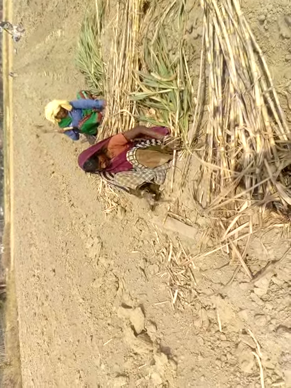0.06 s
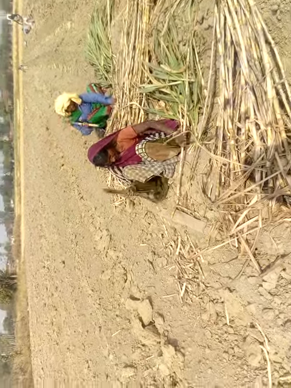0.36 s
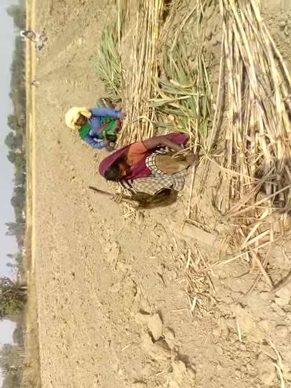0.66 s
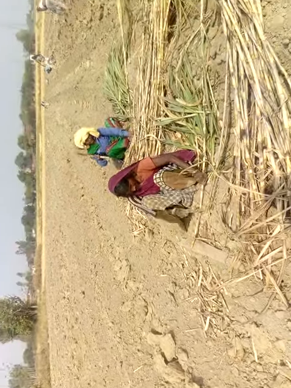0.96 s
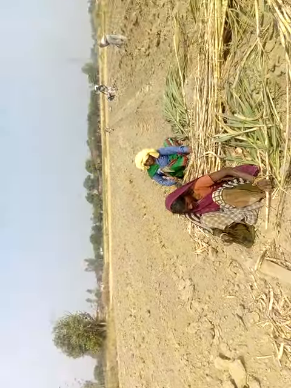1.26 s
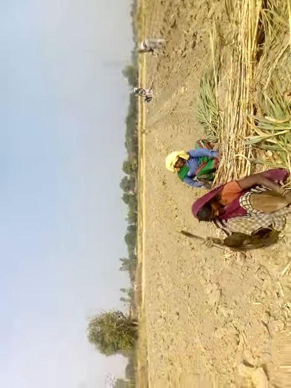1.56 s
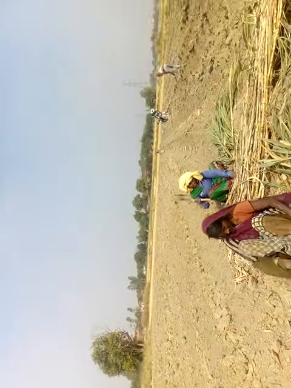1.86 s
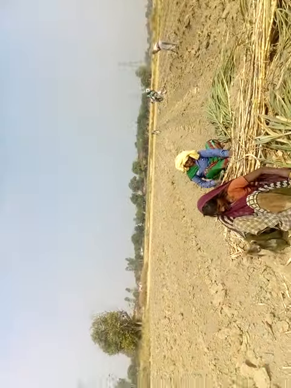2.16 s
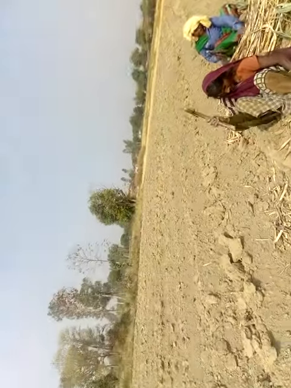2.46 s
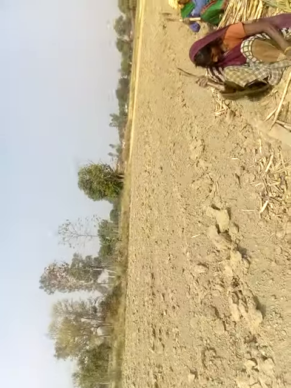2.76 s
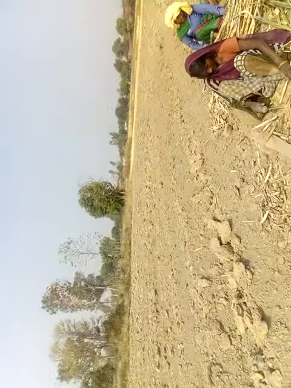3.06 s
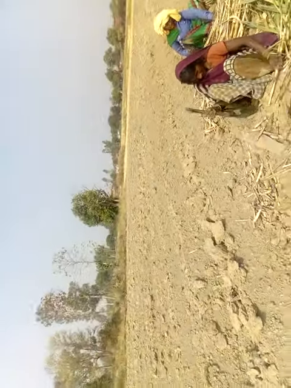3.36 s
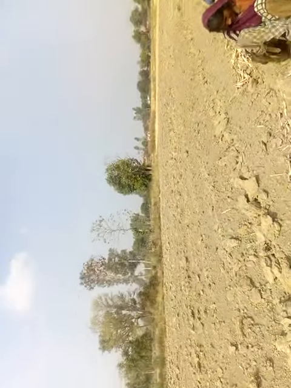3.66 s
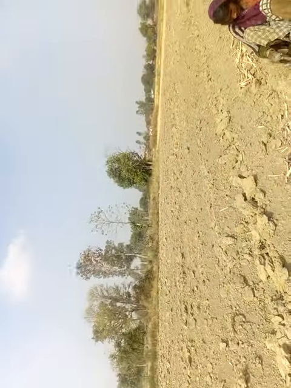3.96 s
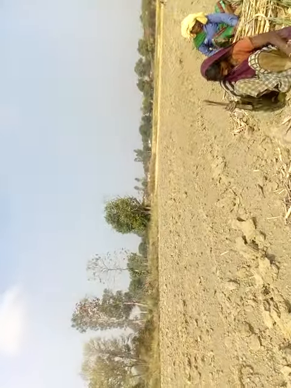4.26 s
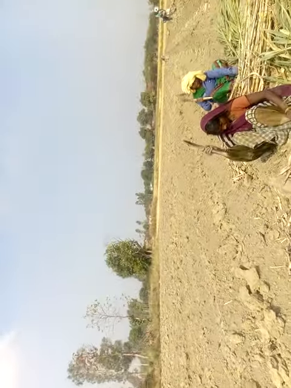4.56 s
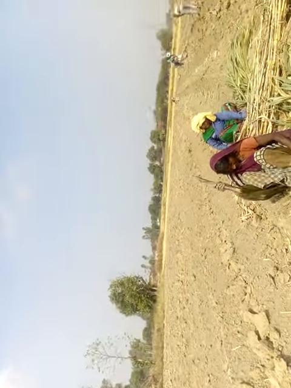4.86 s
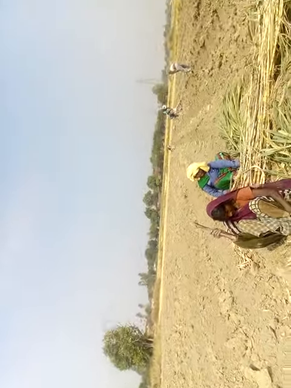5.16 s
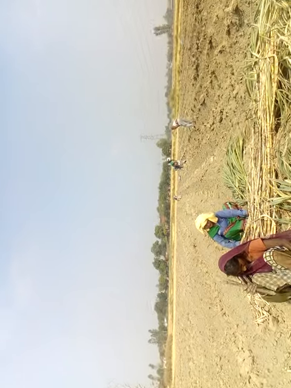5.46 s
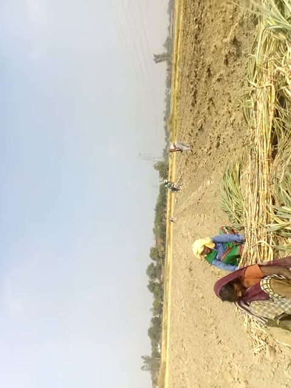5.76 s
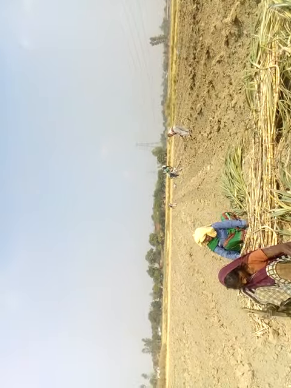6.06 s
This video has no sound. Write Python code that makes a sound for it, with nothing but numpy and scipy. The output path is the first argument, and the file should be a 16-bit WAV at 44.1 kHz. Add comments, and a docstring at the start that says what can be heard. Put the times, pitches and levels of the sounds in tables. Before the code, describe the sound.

Crisp, crunching chops through cane stalks knock on wood, mixed with dry rustling and quick blade scrapes, close by outdoors.

```python
"""Chopping sugarcane in an open field

A sickle crunches through the stalk, knocks a wooden block and thumps the soil; at times the steel rings.
Between strokes the cane is dragged through dry leaves and scraped clean; cut lengths settle on the soil.
Birds whistle far off over a low drone and a soft hush, with a few thin, high tings."""
import sys
import numpy as np
from scipy import signal
from scipy.fft import rfft, irfft, next_fast_len
from scipy.io import wavfile
from scipy.ndimage import uniform_filter1d, map_coordinates

SR = 44100
rng = np.random.default_rng(int(sys.argv[2]) if len(sys.argv) > 2 else 0)


def dump_mix(stems):
    """Bounce the given channels to the path in sys.argv[1] as a 16-bit WAV at rate SR."""
    frames = np.atleast_2d(stems).T  # one column per channel
    limited = np.clip(frames, -1, 1)  # hard clip at full scale
    pcm = np.round(limited * 32767).astype(np.int16)
    wavfile.write(sys.argv[1], SR, pcm)


N = 277830

# Dry-leaf spectrum. Each row: frequency in Hz, density in dB.
LEAF_SPECTRUM = [(800, -31), (1500, -9), (2400, -2.5), (3030, -4), (4350, 4), (5200, 2.5), (6300, 4),
                 (6900, -4), (8100, -22), (11000, -36), (15500, -40)]
LEAVES_REF_DB = -49.5  # heap and crackle levels follow the leaves about this point


def amp(db):
    """Decibels to gain."""
    return 10 ** (np.asarray(db) / 20)


def unit(x):
    """Scale to rms 1."""
    return x / np.sqrt(np.mean(x ** 2) + 1e-20)


def along(points, hz):
    """Interpolate (Hz, value) points on a log axis."""
    knots_hz, values = np.transpose(points)
    return np.interp(np.log(hz + 1), np.log(knots_hz + 1), values)


def wobble(rate_hz):
    """Smooth random curve, rate_hz knots a second."""
    knots = rng.standard_normal(int(N * rate_hz / SR) + 4)
    return map_coordinates(knots, [np.arange(N) * rate_hz / SR])


def filtered(x, response):
    """Apply a gain given as a function of Hz."""
    size = next_fast_len(len(x) + 4096)
    return irfft(rfft(x, size) * response(np.fft.rfftfreq(size, 1 / SR)), size)[:len(x)]


def grit(spectrum, spiky_db, size=N):
    """Dense, uneven clicks, coloured, at rms 1."""
    noise = rng.standard_normal(size)
    spread = np.repeat(rng.standard_normal(size // 16 + 1), 16)[:size]
    clicks = noise * amp(spiky_db * np.clip(spread, -2.5, 2.5))
    return unit(filtered(clicks, lambda hz: amp(along(spectrum, hz))))


def band(centre_hz, octaves, size=N):
    """Noise in one resonance, at rms 1."""
    noise = rng.standard_normal(size)
    return unit(filtered(noise, lambda hz: 1 / (1 + (np.log2((hz + 1) / centre_hz) / octaves) ** 2) ** 2.66))


def patchy(x, depth_db):
    """Vary the colour in patches of time and frequency; rms 1."""
    spectra = signal.stft(x, nperseg=1024)[2]
    patches = rng.standard_normal(spectra.shape)
    for _ in range(2):
        patches = uniform_filter1d(uniform_filter1d(patches, size=7, axis=0), size=9, axis=1)
    return unit(signal.istft(spectra * amp(depth_db * unit(patches)), nperseg=1024)[1][:N])


def ring(modes, t):
    """Damped modes, softly struck, at slightly random strengths."""
    tones = sum(amp(db + rng.standard_normal() - 60 * t / t60_s) * np.sin(2 * np.pi * hz * t)
                for hz, db, t60_s in modes)
    return tones * (1 - np.exp(-t / 0.0006))


def add(track, start_s, sound):
    """Mix a sound into the track."""
    start = round(start_s * SR)
    track[start:start + len(sound)] += sound[:N - start]


def air():
    """Soft, shifting hush of open country."""
    # Each row: frequency in Hz, density in dB.
    hush_spectrum = [(120, 8.5), (250, 4), (700, 2), (1100, -7), (1500, 3.5), (2300, -0.5), (3300, -5),
                     (5500, -2), (6600, -52), (8000, -23.5), (15500, -28.5)]
    return amp(-62) * patchy(grit(hush_spectrum, spiky_db=2), depth_db=4.5)


def drone():
    """Low, wavering drone over the field."""
    # Each row: time in seconds, relative level in dB.
    contour = [(0, -47.5), (0.4, -55.5), (0.9, -58.5), (1.3, -54.5), (1.7, -56.5), (2.1, -51.5), (2.9, -57),
               (3.45, -53), (4.1, -52.1), (4.6, -56), (5.4, -49), (5.9, -50), (6.3, -55.5)]
    # Each row: frequency in Hz, density in dB.
    rumble_spectrum = [(15, -29.5), (28, -21), (42, -0.5), (58, -8), (73, 5.5), (90, -5), (115, -11),
                       (160, -19), (260, -26.5), (500, -86)]
    contour_db = np.interp(np.arange(N) / SR, *np.transpose(contour))
    waver_db = 1.9 * wobble(3.7)
    return amp(contour_db + waver_db - 1.5) * grit(rumble_spectrum, spiky_db=-1)


def birds():
    """Distant whistles swell and fade along bowed, wavering glides."""
    # Each row: start and length in seconds, start and end pitch in Hz, upward bow in Hz, level in dB.
    whistles = [(0.65, 0.33, 5200, 6600, 201.5, -65), (4.821, .18, 1274, 1330, 159, -49),
                (5.599, .5, 4840, 6950, -93.5, -60)]
    out, t = np.zeros(N), np.arange(N) / SR
    for start_s, length_s, start_hz, end_hz, bow_hz, db in whistles:
        progress = np.clip((t - start_s) / length_s, 0, 1)
        arch = np.sin(np.pi * progress)
        glide_hz = start_hz + (end_hz - start_hz) * progress + bow_hz * arch
        waver_db = 1.5 * wobble(40)
        pitch_hz = glide_hz * (1 + 0.0065 * wobble(200))
        out += arch * amp(db + waver_db) * np.sin(2 * np.pi * np.cumsum(pitch_hz) / SR)
    return out


def tings():
    """Thin rings high in the treble: a few clear, weaker ones at random."""
    # Each row: start in seconds, level in dB.
    clear = [(1.118, -61), (1.571, -69), (1.822, -54), (2.009, -60), (2.826, -63), (4.881, -64)]
    faint = [(start_s, -76.5) for start_s in rng.random(10) * N / SR]
    out, t = np.zeros(N), np.arange(SR // 3) / SR
    for start_s, db in clear + faint:
        envelope = amp(db - 60 * t / 0.22) * (1 - np.exp(-t / 0.00086))
        add(out, start_s, envelope * band(9980, octaves=0.036, size=len(t)))
    return out


def ground_scatter(x):
    """Short scatter from clods and piles of cane."""
    # Each row: frequency in Hz, T60 in seconds.
    decay = [(100, 0.31), (500, 0.11), (2000, 0.33), (6000, 0.061), (12000, 0.32)]
    hz, t, spectra = signal.stft(rng.standard_normal(SR // 2), SR, nperseg=256)
    tail = signal.istft(spectra * amp(-60 * t / along(decay, hz)[:, None]), SR, nperseg=256)[1]
    delayed = np.pad(x, (round(0.0073 * SR), 0))
    return signal.fftconvolve(delayed, tail / np.linalg.norm(tail))[:N]


def sliding_db():
    """Leaf level: each pull of the cane swells and fades over a faint steady stir."""
    # Each row: peak time, rise and fall in seconds, level in dB.
    pulls = [(0.005, 0.017, 0.056, -54), (0.5, 0.14, 0.77, -66), (1.35, 0.15, 0.15, -60.5),
             (1.52, 0.056, 0.054, -47), (1.79, 0.17, 0.079, -41.5), (1.929, 0.063, 0.048, -43.5),
             (2.07, 0.062, 0.08, -45.5), (2.26, 0.059, 0.073, -33.5), (2.345, .03, 0.022, -40),
             (2.68, 0.29, 0.14, -59), (2.89, 0.032, .085, -58), (3.445, 0.017, 0.067, -41.5),
             (3.7, 0.16, 0.081, -42.5), (3.875, 0.019, 0.16, -44), (4.24, 0.06, 0.15, -52.5),
             (4.43, .03, 0.059, -49.5), (4.58, 0.3, 0.32, -60.5), (5.03, 0.047, 0.18, -56.5),
             (6.28, 0.2, .1, -63.5)]
    stir_db = -70
    t = np.arange(N) / SR
    swells = [amp(db) * np.exp(-((t - peak_s) / np.where(t < peak_s, rise_s, fall_s)) ** 2)
              for peak_s, rise_s, fall_s, db in pulls]
    return 10 * np.log10(amp(stir_db) ** 2 + np.sum(np.square(swells), axis=0))


def crackle(leaves_db):
    """Single leaves tick at random, louder while the cane moves."""
    when, strength = rng.random((170, 2)).T
    ticks = np.bincount((when * N).astype(int), weights=amp(14 * strength ** 2), minlength=N)
    t = np.arange(SR // 200) / SR
    fracture = grit(LEAF_SPECTRUM, spiky_db=1, size=len(t)) * np.exp(-t / 0.0034)
    level_db = -64.5 + 0.47 * (leaves_db - LEAVES_REF_DB)
    return amp(level_db) * unit(signal.fftconvolve(ticks, fracture)[:N])


def rustle(leaves_db):
    """Dry leaves hiss under the sliding cane; the heap beneath is duller and swells less."""
    # Each row: frequency in Hz, density in dB.
    heap_spectrum = [(100, -12), (170, -10.5), (275, -6.5), (536, -1.5), (632, 0), (1080, 2.5),
                     (1490, -4.5), (1630, -0.5), (2800, -6.5), (3640, -50), (6160, -120)]
    heap_db = -55.5 + 0.73 * (leaves_db - LEAVES_REF_DB)
    catching_db = 0.9 * wobble(45)
    leaves = amp(leaves_db + catching_db) * patchy(grit(LEAF_SPECTRUM, spiky_db=3.5), depth_db=1.6)
    heap = amp(heap_db + catching_db) * patchy(grit(heap_spectrum, spiky_db=3), depth_db=0.2)
    return leaves + heap


def thuds():
    """Loose soil answers a settling length with a few soft, low cycles."""
    # Each row: start in seconds, level in dB, pitch in Hz.
    settlings = [(3.26, -37.5, 106), (3.312, -40, 100.6), (5.06, -44, 84.5), (5.625, -44, 75)]
    rise_s = 0.015
    out, t = np.zeros(N), np.arange(SR // 4) / SR
    swell = (t / rise_s * np.exp(1 - t / rise_s)) ** 2
    for start_s, db, hz in settlings:
        add(out, start_s, amp(db) * swell * np.sin(2 * np.pi * hz * t))
    return out


def landing():
    """A cut length drops on the pile with a dry, hollow tap."""
    # Start in seconds, gain in dB.
    drop = (6.1727, -33.5)
    # Each row: frequency in Hz, relative level in dB, T60 in seconds.
    cane_modes = [(484, -2, 0.051), (660, 14, 0.01), (880, 3.5, 0.034), (1170, -13, 0.052),
                  (1410, -2, 0.026), (2030, -27, 0.028), (750, -16, 0.31)]
    start_s, db = drop
    out, t = np.zeros(N), np.arange(SR // 4) / SR
    clatter = 0.6 * amp(-60 * t / 0.062) * band(1350, octaves=1, size=len(t))
    add(out, start_s, amp(db) * (ring(cane_modes, t) + clatter))
    return out


def snaps():
    """Brittle sheaths crack and bits drop in short bursts."""
    # Each row: start in seconds, level in dB, centre in Hz, width in octaves, length in seconds.
    cracks = [(0.9579, -34.5, 3040, 1, 0.007), (1.0054, -37.5, 985, 0.26, 0.007),
              (1.0983, -41.5, 3230, 0.95, 0.0073), (1.257, -49, 1700, 0.75, 0.022),
              (1.3553, -42, 1590, .9, 0.0061), (3.048, -56.5, 2780, 0.44, 0.0054),
              (3.355, -39, 1340, 1.67, 0.0063), (3.718, -39.5, 527, 1.64, 0.015),
              (4.239, -41.5, 4960, 0.8, 0.008), (4.33, -47.5, 1700, 1.4, 0.0082),
              (4.448, -43, 4440, 1, 0.0064), (4.507, -45, 5330, 0.52, 0.011),
              (5.453, -54.5, 1870, 1.5, 0.026)]
    out, t = np.zeros(N), np.arange(SR // 4) / SR
    attack = 1 - np.exp(-t / 0.0003)
    tail = 0.23 * amp(-60 * t / 0.096)
    for start_s, db, centre_hz, octaves, length_s in cracks:
        burst = attack * (np.exp(-(t / length_s) ** 4) + tail)
        add(out, start_s, amp(db) * burst * band(centre_hz, octaves, size=len(t)))
    return out


def scrapes():
    """Quick blade passes strip the leaves; the rind squeals under the edge."""
    # Each row: peak time, rise and fall in seconds, level in dB, squeal in Hz, squeal in dB re friction.
    passes = [(3.356, 0.017, 0.0099, -42, 5350, -26), (3.509, 0.03, 0.02, -27.5, 5700, -5),
              (3.616, 0.042, 0.025, -25.5, 4900, -6.5), (3.687, 0.021, 0.027, -29, 5830, 6.5),
              (4.278, 0.01, 0.0091, -42.5, 4370, 4.5), (4.293, 0.019, 0.0044, -54, 6240, 20.5)]
    # Each row: frequency in Hz, density in dB.
    friction_spectrum = [(120, -87), (200, -52), (321, -21), (430, -24), (564, -10.5), (607, -19),
                         (665, -13.5), (1560, -11), (1950, -7.5), (3240, -3.5), (5110, -1.5), (6240, 0.5),
                         (8050, -27), (15500, -44)]
    out, t = np.zeros(N), np.arange(SR // 2) / SR
    middle_s = t.mean()
    for peak_s, rise_s, fall_s, db, squeal_hz, squeal_db in passes:
        pressure = np.exp(-np.abs((t - middle_s) / np.where(t < middle_s, rise_s, fall_s)) ** 2.32)
        friction = grit(friction_spectrum, spiky_db=2, size=len(t))
        squeal = amp(squeal_db) * band(squeal_hz, octaves=0.36, size=len(t))
        add(out, peak_s - middle_s, amp(db) * pressure * (friction + squeal))
    return out


def steel(place, t):
    """The sickle rings; the strike point sets which modes speak."""
    # Each row: frequency in Hz, relative level in dB, T60 in seconds, most responsive place from 0 to 1.
    blade_modes = [(2868, -4, 0.58, 0.24), (4530, 0.5, 0.34, .05), (5250, -3.5, 0.33, 0.55),
                   (6150, -1, 0.13, 1), (6760, -26, 0.16, 0.85)]
    return ring([(hz, db - 24 * abs(place - best), t60_s) for hz, db, t60_s, best in blade_modes], t)


def thump(hz, t):
    """The block sinks and bounces on the soil."""
    cycles = hz * t
    return -np.sin(2 * np.pi * cycles) * (1 - np.exp(-(cycles / 1.1) ** 2)) * amp(-6.6 * cycles ** 1.3)


def knock(hz, t):
    """About a cycle and a half of pressure leaves the wooden block ringing."""
    # Each row: frequency in Hz, relative level in dB, T60 in seconds.
    block_modes = [(298, -19, 0.042), (649, -5, 0.021), (850, -10.5, 0.022), (1435, -23, 0.036)]
    cycles = hz * t
    push = np.sin(2 * np.pi * cycles) * np.exp(-((cycles - 0.68) / 0.65) ** 2)
    return push + ring(block_modes, t)


def stalk(cut_s, t):
    """The stalk rings until pinned against the block."""
    # Each row: frequency in Hz, relative level in dB, T60 in seconds.
    stalk_modes = [(993, 4.5, 0.023), (1680, -6, 0.0079)]
    return amp(-60 * np.maximum(t - cut_s, 0) / 0.07) * ring(stalk_modes, t)


def crunch(cut_s, crack_hz, splinter_db, t):
    """Fibres tear steadily, then burst as the last of the rind splits."""
    # Each row of both: frequency in Hz, density in dB.
    fibre_spectrum = [(90, -59), (280, 12.5), (700, -3.5), (1500, 0), (2800, 0.5), (4300, 3.5), (6000, 0.5),
                      (7200, -4), (8500, -17.5), (11000, -28), (16000, -55)]
    splinter_spectrum = [(1500, -21), (4500, -1), (7000, -5), (9000, 7.5), (11000, -1.5), (15500, -3)]
    bite = 1 - np.exp(-t / 0.00091)
    steady = 0.29 * amp(-60 * np.maximum(t - cut_s, 0) / 0.04)
    burst = 0.42 * np.exp(-np.abs(t - cut_s) / 0.0015)
    tearing = bite * (steady + burst)
    fibres = grit(fibre_spectrum, spiky_db=-2, size=len(t))
    rind = 0.64 * band(crack_hz, octaves=0.1, size=len(t))
    splinters = amp(splinter_db) * grit(splinter_spectrum, spiky_db=2, size=len(t))
    return tearing * (fibres + rind) + tearing ** 2 * splinters


def chops():
    """The edge tears through the stalk and hits the block; slower cuts splinter more and thump higher."""
    # Each row: start and cutting time in seconds, crunch in dB, rind crack in Hz, stalk in dB,
    # knock in dB, knock in Hz, thump in dB, steel in dB, place on the blade from 0 to 1.
    strokes = [ (0.6246, 0.0042, -21.5, 5570, -16.5, -15, 322, -9, -41.5, 0.2),
               (1.1125, 0.008, -19.5, 4660, -37, -23, 373, -10.5, -68, .5),
               (1.4726, 0.0058, -24.5, 5900, -25, -11, 431, -10.5, -41, 0.58),
               (1.9937, 0.0078, -18.5, 4540, -31, -26, 503, -11, -76, 0.8),
               (2.3268, 0.0043, -26, 3600, -25, -9, 517, -12, -39.5, 0.47),
               (3.1267, 0.0084, -19.5, 5520, -46, -12.5, 437, -8, -69, 0.6),
               (3.2001, 0.0042, -24.5, 4160, -24, -8.5, 486, -9.5, -49, 0.4),
               (3.8954, 0.0073, -19.5, 6000, -40, -21.5, 510, -17.5, -73, .8),
               (4.1043, 0.0047, -29.5, 5820, -20.5, -9.5, 476, -7.5, -55, 0.6),
               (4.9876, 0.0043, -24, 5860, -22, -12, 470, -8, -55, .3),
               (5.774, 0.00766, -17, 4150, -31.5, -20, 630, -16.5, -67, 0.3)]
    clean_cut_s = 0.0048
    out, t = np.zeros(N), np.arange(SR // 2) / SR
    for (start_s, cut_s, crunch_db, crack_hz, stalk_db,
         knock_db, knock_hz, thump_db, steel_db, place) in strokes:
        extra_s = cut_s - clean_cut_s
        splinter_db = -24.5 + 4500 * extra_s
        thump_hz = 129.3 + 10600 * extra_s
        impact_s = start_s + cut_s
        add(out, start_s, amp(crunch_db) * crunch(cut_s, crack_hz, splinter_db, t))
        add(out, start_s, amp(stalk_db) * stalk(cut_s, t))
        add(out, impact_s, amp(knock_db) * knock(knock_hz, t))
        add(out, impact_s, amp(thump_db) * thump(thump_hz, t))
        add(out, impact_s, amp(steel_db) * steel(place, t))
    return out


def scene():
    """The work close by, the open field around it; mono."""
    work = chops() + snaps() + scrapes() + landing() + thuds()
    scatter = amp(-20.5) * ground_scatter(work)
    leaves_db = sliding_db()
    leaves = rustle(leaves_db) + crackle(leaves_db)
    return (work + scatter + leaves + tings() + air() + drone() + birds())[None]


def record(dry):
    """A small microphone sheds the deepest bass; a band limit cuts the top."""
    low_cut_hz, top_hz = 48, 15800
    thin = signal.sosfilt(signal.butter(2, low_cut_hz, "high", fs=SR, output="sos"), dry)
    return np.array([filtered(channel, lambda hz: hz < top_hz) for channel in thin])


dry = scene()
out = record(dry)
dump_mix(out)
```